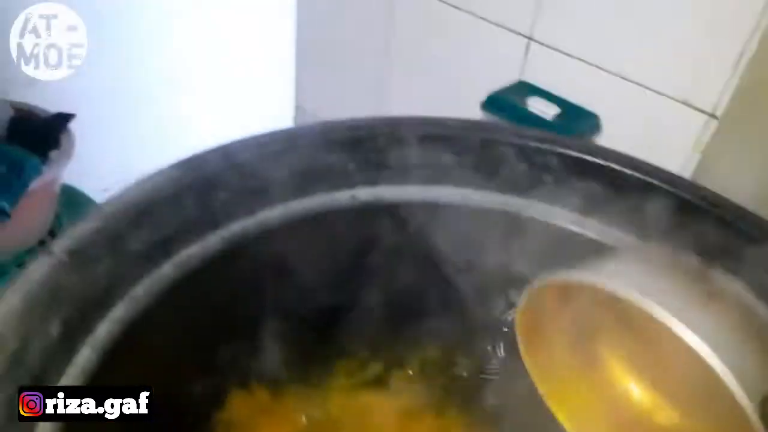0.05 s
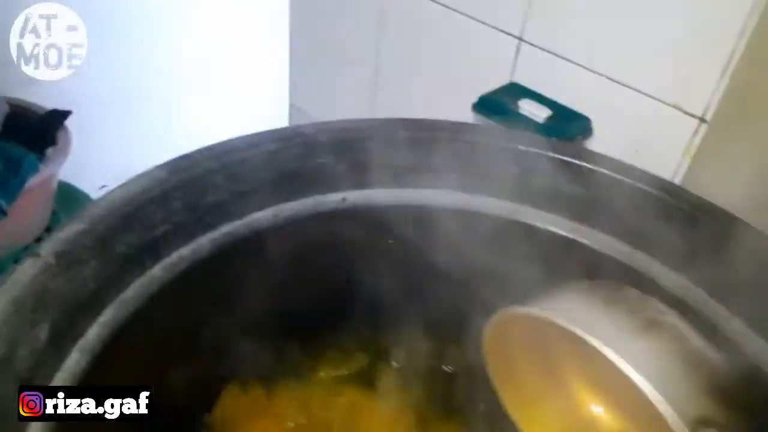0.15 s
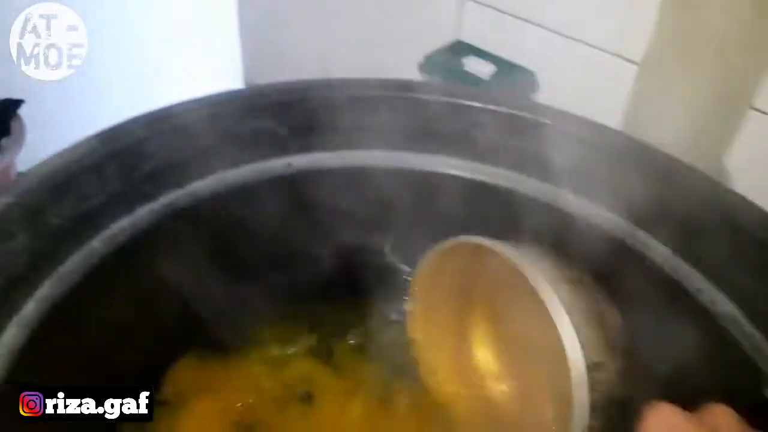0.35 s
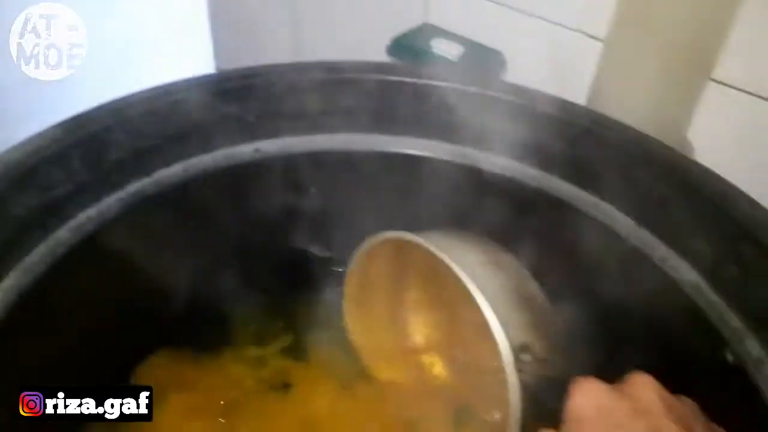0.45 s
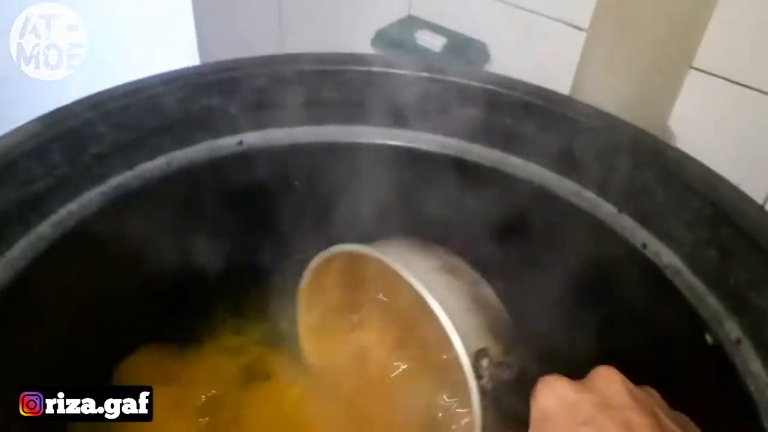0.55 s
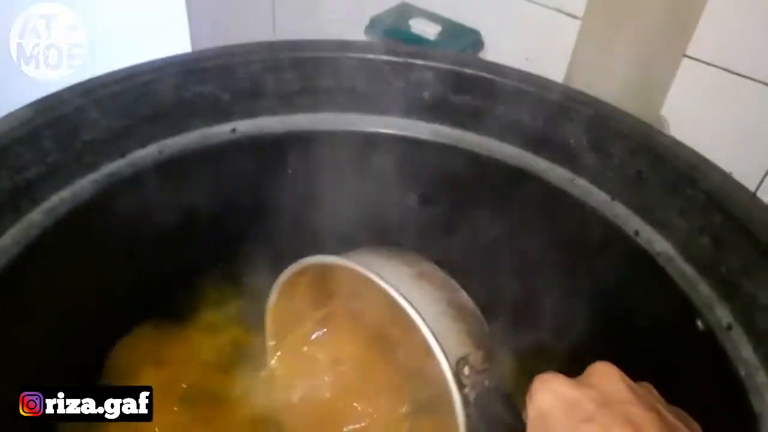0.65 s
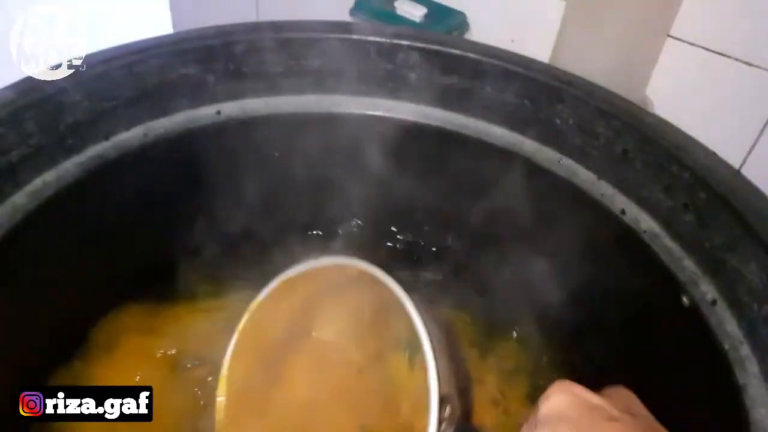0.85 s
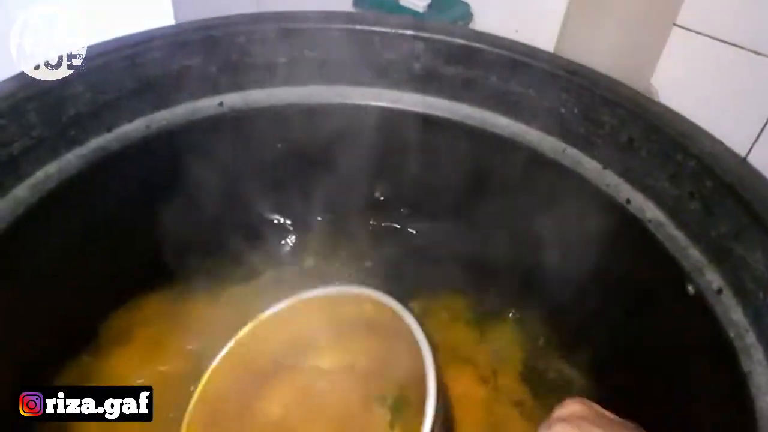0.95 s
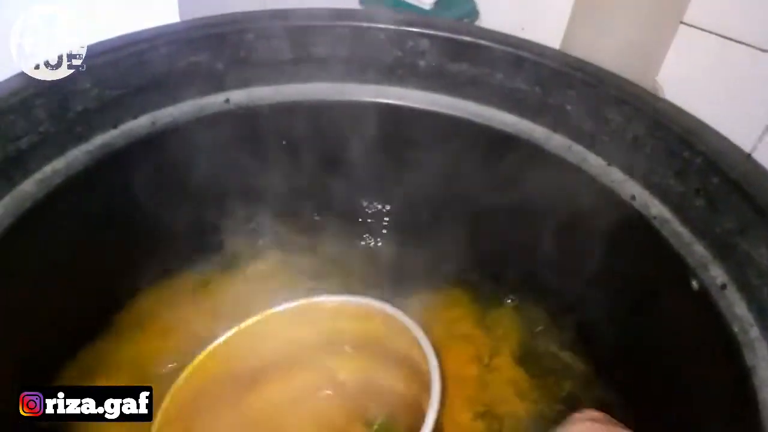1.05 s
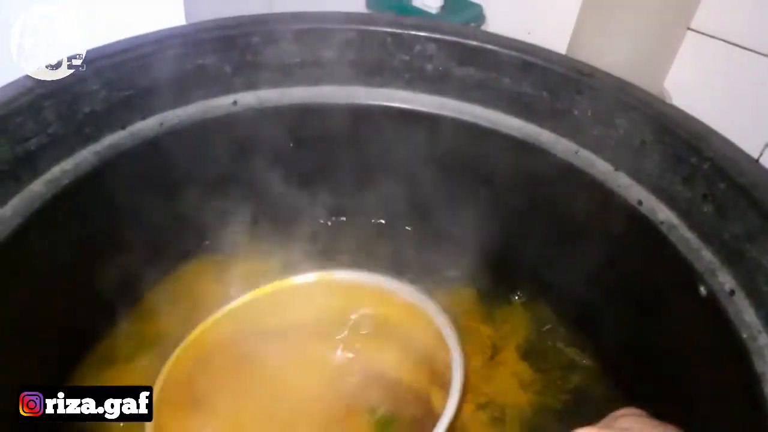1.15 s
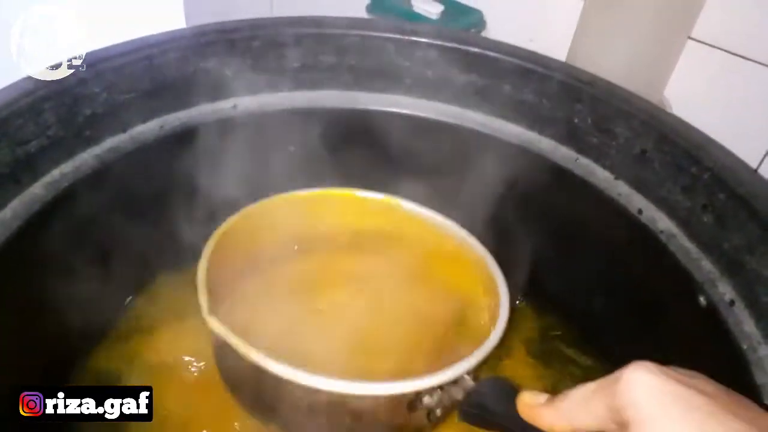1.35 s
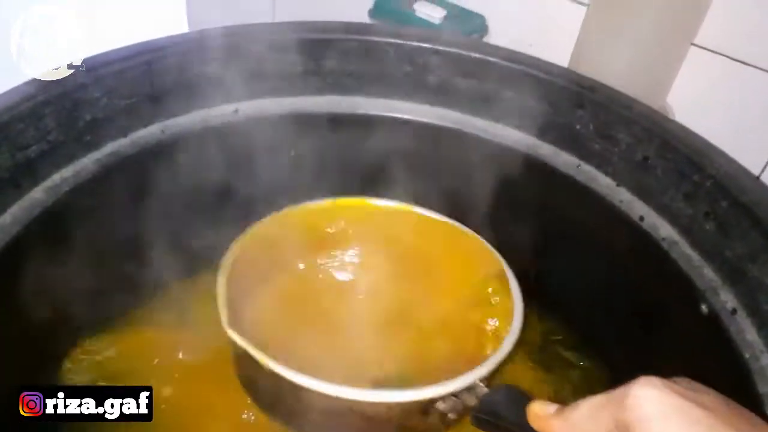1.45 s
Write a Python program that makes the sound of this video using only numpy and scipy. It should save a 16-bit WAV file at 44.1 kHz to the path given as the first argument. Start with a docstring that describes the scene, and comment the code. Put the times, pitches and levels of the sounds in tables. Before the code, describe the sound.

A metal pan scoops hot liquid from a large basin in a tiled kitchen, close to a phone. Low room hum with a very faint high whistle falling until 0.09 s; tiny ticks, then a sharp bright handle clack at 0.2 s. From 0.42 to 0.8 s, clustered hollow knocks and boomy dragging; sloshing peaks near 0.75 s. Bubbles and drips follow, with a clear plop at 1.19 s, fading by 1.45 s.

```python
"""In a tiled kitchen, a metal pan is dipped into a large basin of hot liquid, heard by a phone nearby.
Its handle clatters in noise bursts and one short ring; it bumps and drags, ringing the basin's resonances.
Liquid sloshes as patchy noise and small rising sines; larger bubbles plop and drops spatter as it fills.
A thin whistle falls at the start. The room hums and answers with decaying noise, almost in mono."""
import sys
import numpy as np
from scipy import signal
from scipy.fft import rfft, irfft, next_fast_len
from scipy.io import wavfile
from scipy.ndimage import uniform_filter1d, map_coordinates

SR = 44100
rng = np.random.default_rng(int(sys.argv[2]) if len(sys.argv) > 2 else 0)


def wav_out(sig):
    """Save sig, one row per channel (or a flat mono array), as 16-bit PCM at SR to the path in sys.argv[1]."""
    wavfile.write(sys.argv[1], SR, np.round(np.clip(np.atleast_2d(sig).T, -1, 1) * 32767).astype(np.int16))


def makeup_ratio(level_db):
    """Linear amplitude ratio for a level in decibels (20 dB per factor of ten)."""
    decades = np.asarray(level_db, float) / 20
    return 10 ** decades


N = 66150
TIME = np.arange(N) / SR


def unit(x):
    """Scale to rms 1."""
    return x / np.sqrt(np.mean(x ** 2) + 1e-20)


def along(points, hz):
    """Read (f/Hz, value) points on a log frequency axis."""
    f, v = np.transpose(points)
    return np.interp(np.log(hz + 1), np.log(f + 1), v)


def curve(rows, column=1):
    """Read one column of a t/s table at every sample."""
    rows = np.array(rows, float)
    return np.interp(TIME, rows[:, 0], rows[:, column])


def gate(rows):
    """Soft on and off inside a table's time span."""
    fade_in = np.clip((TIME - rows[0][0]) / 0.0073, 0, 1)
    fade_out = np.clip((rows[-1][0] - TIME) / 0.01, 0, 1)
    return fade_in * fade_out


def wobble(rate):
    """Smooth random curve, rate knots a second."""
    return map_coordinates(rng.standard_normal(int(N * rate / SR) + 4), [TIME * rate])


def filtered(x, response):
    """Apply a complex frequency response to x."""
    m = next_fast_len(N + SR // 2)
    return irfft(rfft(x, m) * response(np.fft.rfftfreq(m, 1 / SR)), m)[..., :N]


def hiss(spectrum):
    """Noise of rms 1, coloured by a spectrum table."""
    return unit(filtered(rng.standard_normal(N), lambda hz: makeup_ratio(along(spectrum, hz))))


def bursts(s, db, length, rise_s):
    """Summed envelopes: quick rise, fall of 1/e per length."""
    t = np.clip(TIME - np.array(s)[:, None], 0, None)
    rise = 1 - np.exp(-t / rise_s)
    fall = np.exp(-t / np.reshape(length, (-1, 1)))
    return (makeup_ratio(np.array(db))[:, None] * rise * fall).sum(axis=0)


def placed(s, k, wave):
    """Sum short waves (one a row, sample offsets k) at their start times."""
    where = (s * SR).astype(int)[:, None] + k
    return np.bincount(where.ravel(), wave.ravel(), N + SR)[:N]


RISE = 0.025  # pitch gain, as a fraction, over a 20 dB fall


def blips(s, hz, db, cycles, swell):
    """Damped sines: swell softly (cycles), fall 20 dB in the given cycles, rise in pitch."""
    k = np.arange(SR // 20)
    u = k / SR * hz[:, None]  # cycles elapsed
    life = u / cycles[:, None]
    envelope = makeup_ratio(db[:, None] - 20 * life) * (1 - np.exp(-u / swell))
    return placed(s, k, envelope * np.sin(2 * np.pi * u * (1 + RISE * life / 2)))


# pan bumping the wall: t/s, level/dB (before the offsets below), bright slap over thud/dB (before trim)
WALL_BUMPS = [(0.422, -12.5, -4), (0.451, -11.5, -11.5), (0.53, -9.5, -5), (0.541, -19.5, -12),
              (0.567, -21, -26), (0.601, -13.5, -12), (0.631, -21, -6), (0.684, -22, -7), (0.749, -15, -16),
              (0.802, -18.5, -18), (0.938, -24.5, -24)]
# colour of the slap: f/Hz, relative level/dB per Hz
SLAP_COLOUR = [(470, -30), (1000, -4), (1810, -10), (3420, -3.5), (8880, -6.5), (12800, -17.5),
               (16000, -31)]
PUSH_S, PUSH_DB, RATTLE_DB = 0.00028, 20, 10  # the blow itself, then a rattle while contact lasts
CONTACT_S, SLAP_S = 0.0094, 0.0057  # 1/e lengths
THUD_LAG_S, GIVE_HZ = 0.001444, 302  # wall answers just after the slap, and yields to slower pushes


def bumps():
    """Each blow and its rattle ring the walls, with a bright slap on top."""
    s, db, slap_db = np.transpose(WALL_BUMPS)
    push = bursts(s + THUD_LAG_S, db + PUSH_DB, PUSH_S, rise_s=0.0001)
    rattle = rng.standard_normal(N) * bursts(s, db + RATTLE_DB, CONTACT_S, rise_s=0.0012)
    force = filtered(push + rattle, lambda hz: 1j * hz / (GIVE_HZ + 1j * hz))
    slap = hiss(SLAP_COLOUR) * bursts(s, db + slap_db - 2.5, SLAP_S, rise_s=0.00069)
    return basin(force) + slap


# pan dragging through the liquid: t/s, level/dB (before DRAG_DB or BOOM_DB)
DRAG_LEVEL = [(.41, -43), (.44, -28.5), (.51, -33), (.56, -27.5), (.69, -23.5), (.72, -32), (.83, -32.5),
              (.95, -39.5), (1.15, -47)]
DRAG_DB, DRAG_JOLTS_PER_S = -5, 260


def drag():
    """A run of random small jolts, softened, rings the same walls."""
    jolts = (rng.random(N) < DRAG_JOLTS_PER_S / SR) * rng.standard_normal(N)
    jolts = jolts + 0.032 * rng.standard_normal(N)
    uneven = jolts * makeup_ratio(3.1 * wobble(39.13))
    soft = filtered(uneven, lambda hz: 1 / (1 + 1j * hz / 500))
    return unit(basin(soft)) * makeup_ratio(curve(DRAG_LEVEL) + DRAG_DB) * gate(DRAG_LEVEL)


BOOM_HZ, BOOM_WIDTH_HZ, BOOM_DB = 121.3, 26.5, -10.5  # a low boom of the basin, under the drag


def boom():
    """Moving liquid keeps a low note of the basin sounding: noise through one resonance."""
    resonance = lambda f: 1j * f / (BOOM_HZ ** 2 - f * f + 1j * f * BOOM_WIDTH_HZ)
    note = filtered(rng.standard_normal(N), resonance)
    level_db = uniform_filter1d(curve(DRAG_LEVEL), size=3000) + BOOM_DB
    return unit(note) * makeup_ratio(level_db) * gate(DRAG_LEVEL)


# resonances of pan and basin: f/Hz, width/Hz, level/dB
WALL_MODES = [(77, 11, -2.5), (277.4, 29.7, 4), (473.7, 52, 0), (555, 45.5, 0.5), (704, 22, -7.5),
              (799, 29, -6.5), (922, 47, 0.5), (1430, 250, -12), (2070, 370, -11.5), (2510, 190, -7),
              (3330, 490, -15.5), (4720, 260, -35)]


def basin(force):
    """The force rings the walls of pan and basin, neighbouring modes in opposite sign."""
    def response(f):
        total = 0
        for k, (centre, width, db) in enumerate(WALL_MODES):
            mode = 1j * f * width / (centre * centre - f * f + 1j * f * width)
            total = total + (-1) ** k * makeup_ratio(db) * mode
        return total
    return filtered(force, response)


# sharp metal contacts of the handle: t/s, level/dB (before a 10 dB trim), 1/e length/s
HANDLE_CONTACTS = [(0.202, -6, 0.0028), (0.2043, -6.5, 0.015), (0.225, -21, 0.0044)]
# colour of the contacts: f/Hz, relative level/dB per Hz
METAL_COLOUR = [(250, -26), (1510, -9.5), (2400, -16), (3600, -7), (4910, -9.5), (9390, -6.5), (14700, -22),
                (16000, -28)]
SNAP_S, SNAP_HZ, SNAP_DB, SNAP_CYCLES = 0.2237, 5640, 3.5, 2.2  # the sharpest contact is one short ring


def clatter():
    """Bright, dry metal contacts: noise bursts and one quickly damped sine."""
    s, db, length = np.transpose(HANDLE_CONTACTS)
    shape = bursts(s, db - 10, length, rise_s=0.00014)
    snap = blips(*np.transpose([(SNAP_S, SNAP_HZ, SNAP_DB, SNAP_CYCLES)]), swell=0.34)
    return hiss(METAL_COLOUR) * shape + snap


# liquid streaming: t/s, level/dB (fizz and small bubbles both follow it)
STREAM_LEVEL = [(.41, -50), (.52, -73), (.6, -42), (.75, -38), (.87, -41), (1.0, -44.5), (1.11, -47),
                (1.25, -48.5), (1.45, -51.5)]
ROUGH_DB = 1.5  # flutter of the large bubbles
SWELL_CYCLES = 2.3  # soft start of a bubble


def liquid():
    """Streaming fizz and small bubbles, then the large bubbles."""
    stream = makeup_ratio(curve(STREAM_LEVEL)) * gate(STREAM_LEVEL) * (fizz() + small_bubbles())
    return stream + plops() * makeup_ratio(ROUGH_DB * wobble(350))


# large bubbles: t/s, f/Hz, level/dB
LARGE_BUBBLES = [(0.454, 3100, -17), (.617, 6710, -19), (0.753, 522, -17.5), (.751, 980, -26.5),
                 (.776, 2210, -22.5), (0.816, 1320, -21), (.879, 2200, -26), (.916, 3040, -25.5),
                 (.935, 960, -23.5), (.966, 2560, -21.5), (.973, 1585, -20.5), (1.003, 2350, -18),
                 (1.013, 2470, -24), (1.046, 1333, -24.5), (1.069, 1130, -23.5), (1.126, 1820, -24.5),
                 (1.146, 3860, -27), (1.159, 4680, -33.5), (1.189, 1247, -9), (1.192, 2284, -21),
                 (1.192, 1590, -31.5), (1.204, 1403, -19.5), (1.200, 629, -27), (1.216, 643, -20),
                 (1.232, 1920, -16.5), (1.253, 2665, -27), (1.287, 3580, -28.5)]
FADE_CYCLES, FADE_S = 14.2, 0.0035  # a bubble drops 20 dB in these cycles plus this time
BROOD_DB, BROOD_S, BROOD_OCTAVES = -3, 0.023, 0.99  # smaller bubbles: top level, time and pitch spread
BURST_DB, BURST_S, BURST_OCTAVES = -19.5, 0.0036, 0.43  # the splash that opens each large bubble


def plops():
    """Each large bubble rings as a damped sine, with its opening splash and its brood."""
    s, hz, db = np.transpose(LARGE_BUBBLES)
    s2, hz2, db2 = np.repeat([s, hz, db], repeats=9, axis=1)
    draw = rng.random((len(s2), 3))
    s2 = s2 + BROOD_S * (draw[:, 0] - 0.15)
    hz2 = hz2 * 2 ** (BROOD_OCTAVES * (draw[:, 1] - 0.35))
    db2 = db2 + BROOD_DB - 8 * draw[:, 2]
    brood = blips(s2, hz2, db2, np.full(len(s2), 7.0), SWELL_CYCLES)
    large = blips(s, hz, db, FADE_CYCLES + FADE_S * hz, SWELL_CYCLES)
    return large + brood + spatter(s, hz, BURST_OCTAVES, db + BURST_DB, BURST_S)


SMALL_PER_S, SMALL_HZ, SMALL_DB = 740, 2240, -0.5  # rate, reference pitch, level against the fizz


def small_bubbles():
    """Clumps of small bubbles: damped sines at random times, pitches and levels."""
    draw = rng.random((int(SMALL_PER_S * N / SR), 4))
    hz = SMALL_HZ * 2 ** (3 * (draw[:, 1] - 0.6))
    db = -2.8 * np.log(draw[:, 2] + 0.032)
    small = blips(draw[:, 0] * N / SR, hz, db, 4 + 7 * draw[:, 3], SWELL_CYCLES)
    return makeup_ratio(SMALL_DB) * unit(small * makeup_ratio(1.4 * wobble(30.5)))


# colour of the fine spray: f/Hz, relative level/dB per Hz
FIZZ_COLOUR = [(410, -14), (700, -7.5), (1060, -12), (2330, -7), (3840, -15), (8650, -15.5), (16000, -21.5)]
PATCHY_DB = 2.5  # rms depth of the spray patches


def fizz():
    """Fine spray, louder and softer in random patches of time and pitch."""
    z = signal.stft(hiss(FIZZ_COLOUR), nperseg=256)[2]
    field = uniform_filter1d(rng.standard_normal(z.shape), size=10, axis=0)
    field = uniform_filter1d(field, size=6, axis=1)
    spray = signal.istft(z * makeup_ratio(PATCHY_DB * unit(field)), nperseg=256)[1][:N]
    return unit(spray) * makeup_ratio(wobble(60.34) + 1.5)


# short rough bursts, two faint ticks before the clatter, then drops and splashes:
# t/s, centre f/Hz, width/octaves, level/dB
SHORT_BURSTS = [(.126, 2520, 0.18, -44), (0.1873, 5170, 0.36, -38), (0.968, 2800, 0.29, -41),
                (.999, 2900, 0.29, -29), (1.068, 2500, 0.3, -31), (1.125, 8730, .12, -35.5),
                (1.184, 9650, 0.28, -37), (1.232, 5780, 0.054, -44), (1.2545, 8600, 0.12, -38.5),
                (1.265, 5760, .1, -39), (1.287, 4250, 0.36, -37.5), (1.339, 6340, 0.55, -40),
                (1.346, 4460, 0.48, -40.5)]


def ticks_and_drops():
    """Two faint ticks, then drops and splashes: short rough noise bursts, each in its own band."""
    return spatter(*np.transpose(SHORT_BURSTS), length=0.007)


def spatter(s, hz, octaves, db, length):
    """Rough noise bursts, each in its own bell-shaped band, falling 1/e per length."""
    k = np.arange(2048)
    f = np.fft.rfftfreq(len(k), 1 / SR) + 1
    band = np.exp(-0.5 * (np.log2(f / hz[:, None]) / np.reshape(octaves, (-1, 1))) ** 2)
    noise = irfft(rfft(rng.standard_normal((len(s), len(k)))) * band)
    noise = noise / noise.std(axis=1, keepdims=True)
    envelope = (1 - np.exp(-k / SR / 0.00042)) * np.exp(-k / SR / length)
    return placed(s, k, noise * makeup_ratio(db[:, None]) * envelope)


# a thin falling whistle: t/s, f/Hz, level/dB
WHISTLE_GLIDE = [(0, 12250, -57), (.03, 11750, -57), (.075, 11400, -59), (.088, 11150, -70)]
TWIN_RATIO = 1.1  # pitch of the twin above it


def whistle():
    """Two thin sines gliding down together, silent after 0.09 s."""
    phase = 2 * np.pi * np.cumsum(curve(WHISTLE_GLIDE)) / SR
    pair = np.sin(phase) + 0.67 * np.sin(TWIN_RATIO * phase)
    return makeup_ratio(curve(WHISTLE_GLIDE, column=2)) * (TIME < 0.09) * pair


# decay of the tiled room: f/Hz, time to fall 60 dB t/s
TILE_DECAY = [(200, 0.67), (1300, 0.38), (4000, 0.55), (10000, 0.25), (16000, 0.88)]


def tiles(x):
    """Noise tail in which each frequency of the room's answer dies at its own speed."""
    hz, t, z = signal.stft(rng.standard_normal(SR // 2), SR, nperseg=256)
    decay = makeup_ratio(-60 * t / along(TILE_DECAY, hz)[:, None])
    tail = signal.istft(z * decay, SR, nperseg=256)[1]
    delayed = np.pad(x, (150, 0))  # samples before the answer
    return signal.fftconvolve(delayed, tail / np.linalg.norm(tail))[:N]


# colour of the room hum: f/Hz, relative level/dB per Hz
HUM_COLOUR = [(24, -43), (40, 3.5), (220, -13.5), (354, -5), (503, -17), (1120, -5), (1590, -19),
              (2400, -18), (6500, -26), (11600, -24), (16000, -34)]
# strength of the room hum: t/s, level/dB
HUM_STRENGTH = [(0, -44), (.15, -46), (.4, -51), (1.3, -49.5), (1.5, -46)]


def hum(flutter_db):
    """The room's steady coloured noise, with a slow level curve plus flutter."""
    return hiss(HUM_COLOUR) * makeup_ratio(curve(HUM_STRENGTH) + flutter_db)


# faint diffuse noise, opposite in sign at left and right: f/Hz, level/dB (before TILES_DB)
SIDE_LEVEL = [(5000, -29), (12000, -27)]
TILES_DB, WET_ROOM_DB = -7, -6  # room level; less room deep in the basin


def scene():
    """Pan and liquid in front, the room and its hum behind, in left and right."""
    solid, wet = clatter() + bumps() + drag() + boom(), liquid() + ticks_and_drops()
    send = solid + makeup_ratio(WET_ROOM_DB) * wet
    diffuse = tiles(send) + hum(0)
    side = filtered(diffuse, lambda hz: makeup_ratio(along(SIDE_LEVEL, hz) + TILES_DB))
    middle = solid + wet + makeup_ratio(TILES_DB) * tiles(send) + hum(wobble(15.3)) + whistle()
    return middle + np.array([side, -side])


def band_limit(x):
    """A steep low-pass at the top of the band."""
    return signal.sosfilt(signal.butter(12, 16510, fs=SR, output="sos"), x)


# microphone port resonances: f/Hz, half-width/Hz, level/dB
PORT_MODES = [(4950, 220, 5), (8700, 450, 4)]
# colour of the left port against the right: f/Hz, level/dB
LEFT_OVER_RIGHT = [(60, -.9), (1500, -.7), (4000, -.9), (6500, -2.3), (9500, -3.5), (11500, 0)]
SKEW_RAD, LOW_CUT_HZ = 0.029, 55  # phase lead of the left port over the right, below 11 kHz; bass cut


def record(dry):
    """The phone cuts the bass and the top; its ports ring a little and differ in colour and phase."""
    side = np.array([[0.5], [-0.5]])

    def microphone(hz):
        band = (hz < 15700) * (1j * hz / (LOW_CUT_HZ + 1j * hz)) ** 2
        ports_db = sum(db / (1 + ((hz - c) / w) ** 2) for c, w, db in PORT_MODES)
        colour = makeup_ratio(ports_db + along(LEFT_OVER_RIGHT, hz) * side)
        return band * colour * np.exp(1j * SKEW_RAD * side * (hz < 11000))

    mix = filtered(dry, microphone)
    return band_limit(mix)


dry = scene()
out = record(dry)
wav_out(out)
```